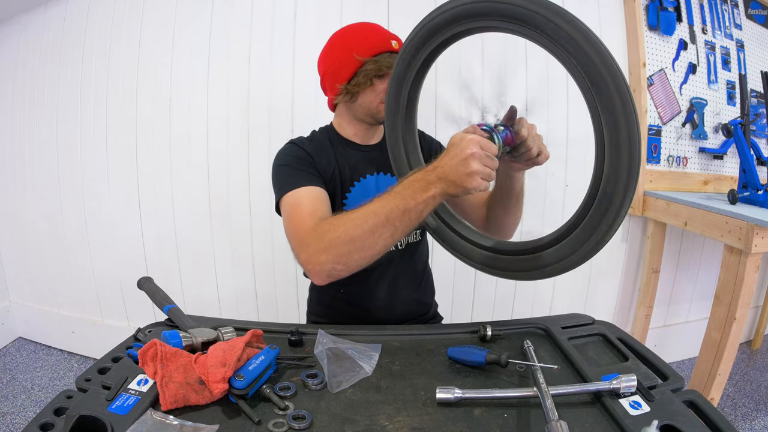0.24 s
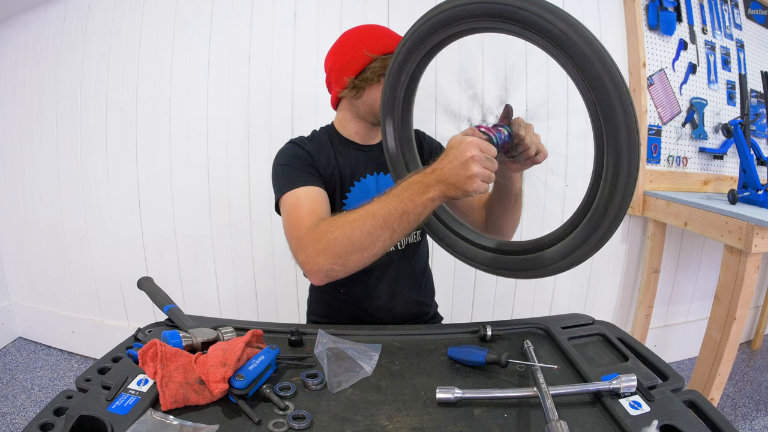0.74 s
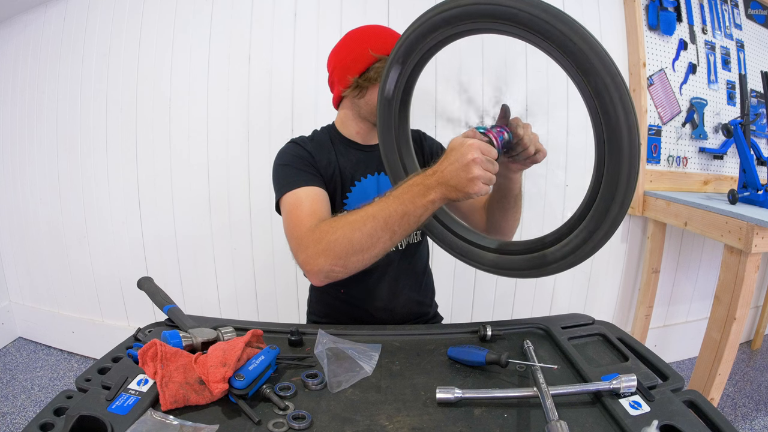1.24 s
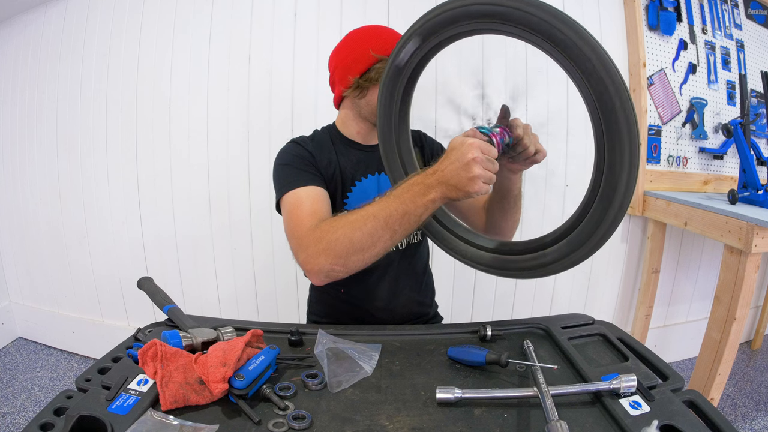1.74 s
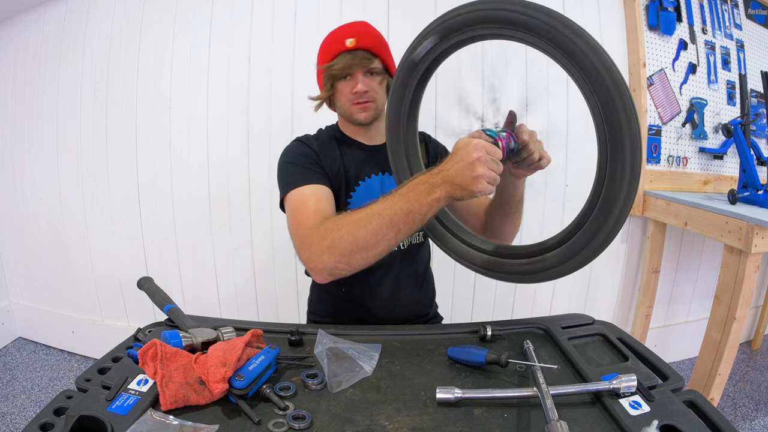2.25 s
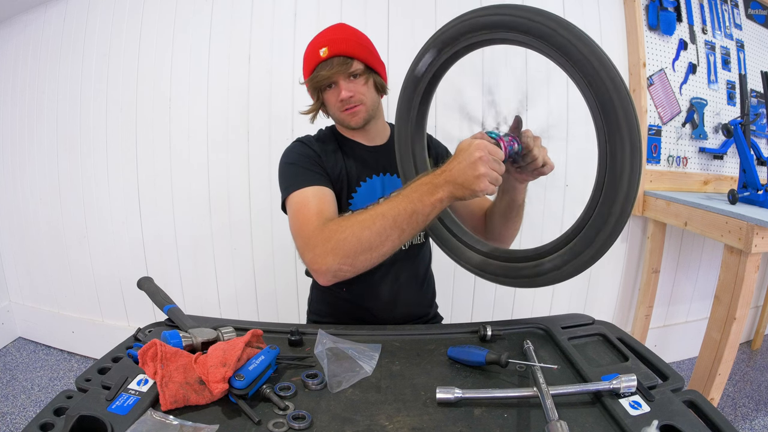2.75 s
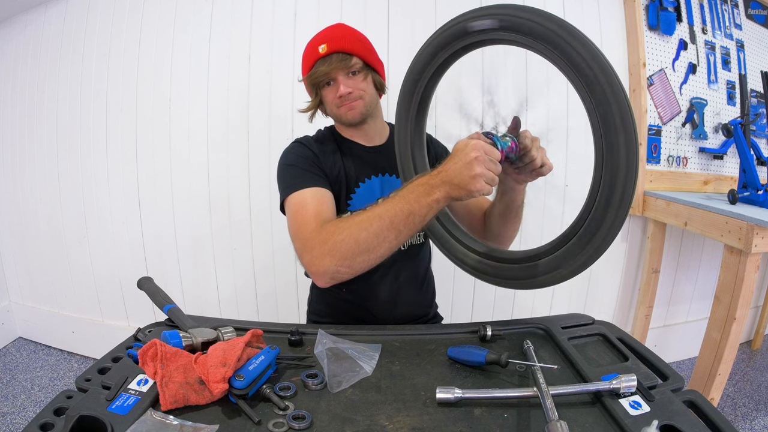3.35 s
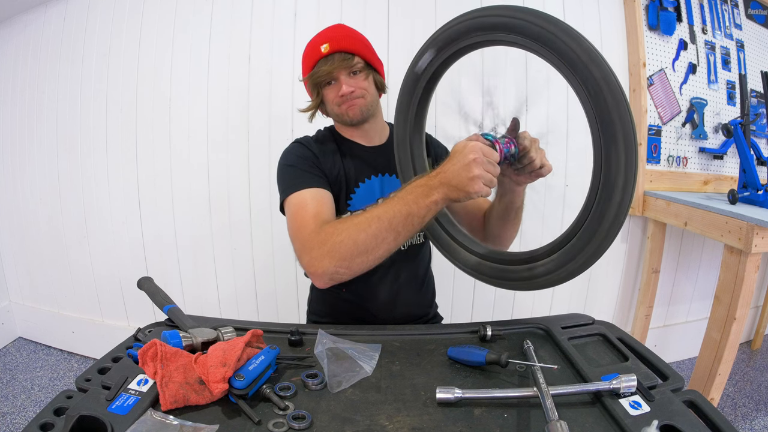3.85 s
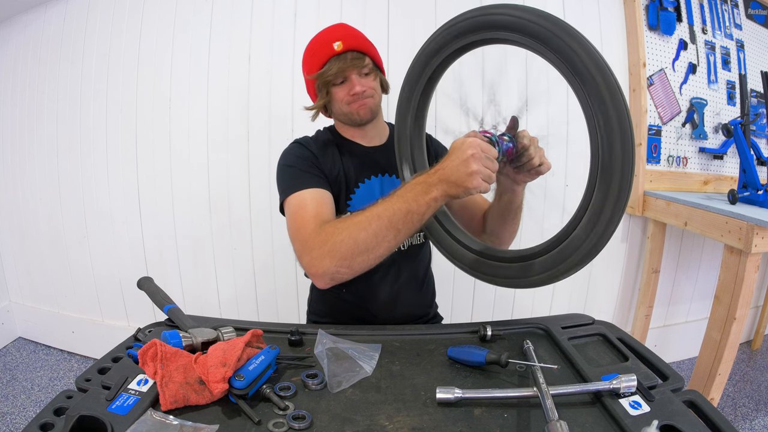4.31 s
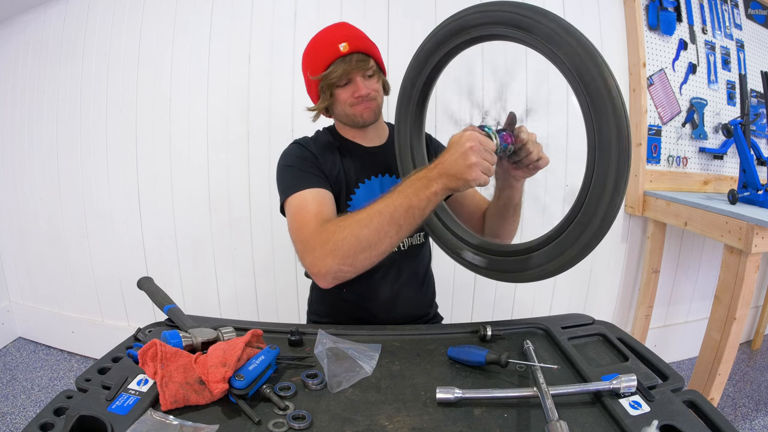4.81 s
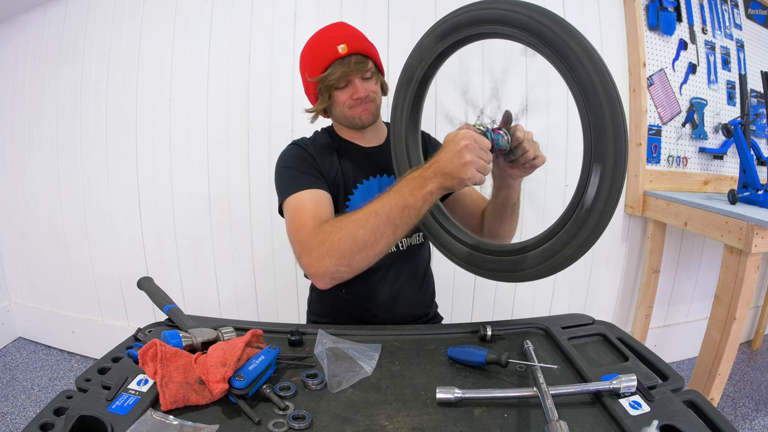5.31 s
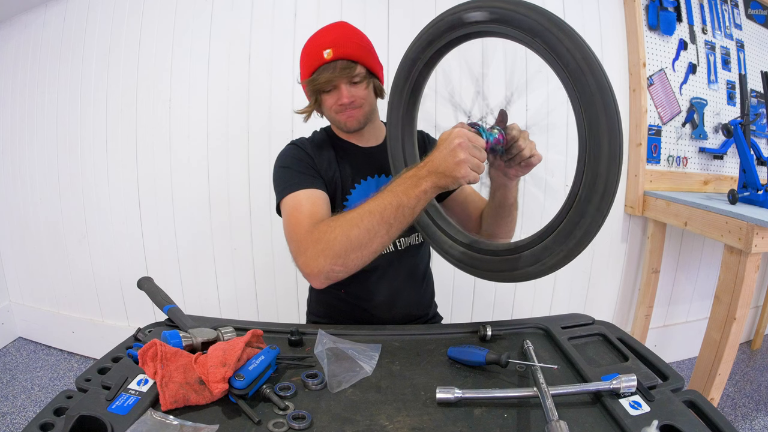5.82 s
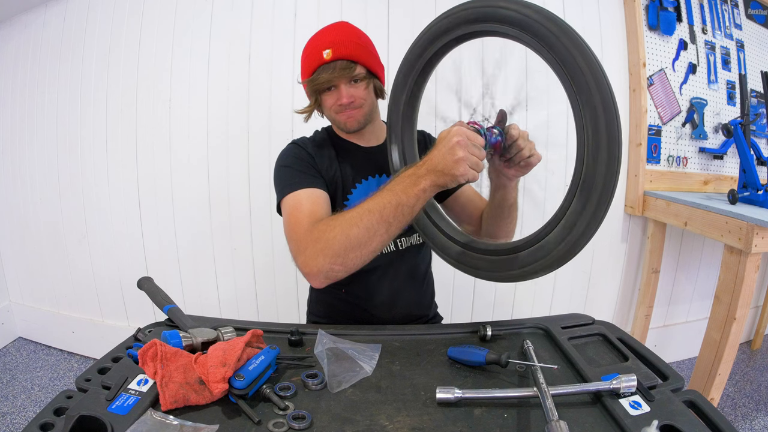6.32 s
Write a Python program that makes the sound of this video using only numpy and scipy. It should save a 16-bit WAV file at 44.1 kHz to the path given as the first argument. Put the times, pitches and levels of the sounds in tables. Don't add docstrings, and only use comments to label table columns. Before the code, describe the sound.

Bright metallic ratchet buzz from a freely spinning bicycle hub, gradually dropping in pitch and softening, over faint room hum and ventilation.

```python
import sys
import numpy as np
from scipy import signal
from scipy.fft import rfft, irfft, next_fast_len
from scipy.io import wavfile
from scipy.ndimage import uniform_filter1d

SR = 44100
rng = np.random.default_rng(int(sys.argv[2]) if len(sys.argv) > 2 else 0)


def output_pcm(signal):
    pcm = np.clip(np.atleast_2d(signal).T, -1, 1) * 32767
    wavfile.write(sys.argv[1], SR, np.round(pcm).astype(np.int16))


def gain_from_db(level_db):
    decades = np.asarray(level_db, float) / 20
    return 10 ** decades


N = 289704
T = np.arange(N) / SR
TEETH = 69

# t/s, tooth-passing rate f/Hz
WHEEL_SPEED = [(0.0, 160), (0.73, 152.4), (1.46, 145), (2.19, 136.5), (2.92, 127.4), (3.65, 122.2),
               (4.38, 113.5), (5.11, 106.6), (5.84, 98.65), (6.57, 90.3)]


def evened(x):
    return x / np.sqrt(np.mean(x ** 2) + 1e-20)


def read(points, hz):
    f, value = np.transpose(points)
    return np.interp(np.log(hz + 1), np.log(f + 1), value)


def causal(power, size=4096):
    log_gain = np.log(power + 1e-10) / 2
    phase = -signal.hilbert(log_gain).imag
    return np.fft.ifft(np.exp(log_gain + 1j * phase)).real[:size]


def bump(s, length):
    return np.exp(-(2 * (T - s) / length) ** 2)


def band_of(x, edges):
    sos = signal.butter(3, edges, "band", fs=SR, output="sos")
    return signal.sosfiltfilt(sos, x)


def room_noise():
    # f/Hz, density level/dB per Hz
    ventilation = [(12, -37), (20, -7), (65, -4), (135, -9), (221, 1), (274, -6), (308, -4.5), (330, -3),
                   (430, 2), (730, -120)]
    # f/Hz, rms level/dB
    hum_lines = [(30.2, -83.5), (60.1, -79.5), (90.2, -81), (120.2, -83.5), (165, -82), (231, -83.5),
                 (360.5, -69.5)]
    hz = np.fft.rfftfreq(N, 1 / SR)
    noise = irfft(rfft(rng.standard_normal(N)) * gain_from_db(read(ventilation, hz)), N)
    hum = sum(np.sqrt(2) * gain_from_db(db) * np.sin(2 * np.pi * (f * T + rng.random())) for f, db in hum_lines)
    return gain_from_db(-68.5) * evened(noise) + hum


def tail():
    # f/Hz, t60/s
    wall_decay = [(300, 1.3), (2000, 0.97), (6000, 3), (15000, 1)]
    # f/Hz, level/dB
    reverberant_share = [(300, -6), (800, -3), (1400, 2), (2500, 8.5), (15000, 10.5)]
    spacing = 12
    taps = np.zeros(SR // 3)
    slots = np.arange(120, len(taps) - 20, spacing)
    signs = rng.choice([-1., 1.], len(slots))
    taps[slots + rng.integers(0, spacing, len(slots))] = signs * np.sqrt(spacing)
    hz, t, z = signal.stft(taps, SR, nperseg=128)
    t60 = np.clip(read(wall_decay, hz), .45, 2)[:, None]
    energy = SR * t60 / (2 * np.log(1000))
    decay = gain_from_db(read(reverberant_share, hz)[:, None] - 60 * t / t60)
    return signal.istft(z * decay / np.sqrt(energy), SR, nperseg=128)[1]


def walls(x, turns, count=15, per_turn=.57):
    size = next_fast_len(len(x) + SR // 2)
    out = rfft(x, size)
    for k in range(count):
        away = (turns * per_turn * count - k + count / 2) % count - count / 2
        share = np.cos(np.pi / 2 * np.clip(away, -1, 1))
        out = out + rfft(share * x, size) * rfft(tail(), size)
    return irfft(out, size)[:len(x)]


def scatter(spread_s=0.00168):
    lag = uniform_filter1d(rng.standard_normal(2049), size=90)
    lag = spread_s * (lag - lag.min()) / np.ptp(lag)
    return irfft(np.exp(-2j * np.pi * np.cumsum(lag) * SR / 4096))


def body():
    # f/Hz, density level/dB per Hz
    snap_colour = [(250, -60), (350, -23.5), (480, -28.5), (570, -17.5), (700, -41), (990, -14.5),
                   (1370, -18), (1800, -28.5), (2800, -17.5), (4600, -14), (5500, -16.5), (8000, -14.5),
                   (10550, -20), (15800, -20)]
    # f/Hz, bandwidth/Hz, level/dB
    wheel_modes = [(436.6, 7.5, -13.5), (633, 77, -10), (824.4, 83, -3), (844.4, 26, -6), (903, 38, -6),
                   (1080, 85, -12.5), (1215, 77, -15), (1483, 24, -7), (1605, 170, -9.5), (1750, 56, -17),
                   (1995, 115, -3.5), (2120, 96, 1), (2300, 332, -1), (2284, 22, -1), (3033, 240, -9),
                   (3386, 210, -8), (3667, 155, -9.5), (4120, 90, -12), (5035, 113, -11.5),
                   (6060, 150, -17.5), (7100, 420, -8.5), (7660, 290, -13), (8320, 490, -13),
                   (9150, 350, -14.5), (10050, 280, -18), (11440, 590, -21), (11940, 440, -19),
                   (13820, 400, -25), (15700, 400, -31)]
    hz = abs(np.fft.fftfreq(2 ** 14, 1 / SR))
    peaks = sum(gain_from_db(2 * db) / (1 + (2 * (hz - f) / width) ** 2) ** 1.37 for f, width, db in wheel_modes)
    steep_bass = 1 / (1 + (360 / (hz + 1)) ** 9)
    return causal((gain_from_db(2 * read(snap_colour, hz)) + peaks) * steep_bass)


def train(at, heights):
    near = np.floor(at * SR).astype(int)[:, None] + np.arange(-7, 9)
    off = near - at[:, None] * SR
    shape = np.sinc(off) * np.cos(np.pi * off / 16) ** 2
    places = np.clip(near + SR, 0, N + SR).ravel()
    return np.bincount(places, (heights[:, None] * shape).ravel(), N + SR + 1)[:-1]


def pawls(jitter_s=.000035, spread_db=1.7, tooth_error=0.0074, bounce_db=-9, bounce_s=0.000591):
    # place in tooth/1, spring level/dB, wobble once a turn/teeth, wobble thrice a turn/teeth
    pawl_set = [
        (.02, 2, 0.0304, 0.0159),
        (.2, -14.5, 0.0582, 0.025),
        (.37, -7.5, 0.036, 0.019),
        (.55, -6.5, 0.0472, 0.019),
        (.68, -8.5, 0.041, 0.018),
        (.87, -11, 0.0552, 0.023),
    ]
    t = np.arange(-SR, N) / SR
    passed = np.cumsum(np.interp(t, *np.transpose(WHEEL_SPEED))) / SR
    tooth = np.arange(1200)
    ring = rng.standard_normal(TEETH)
    out = 0
    for k, (place, db, once, thrice) in enumerate(pawl_set):
        angle = 2 * np.pi * (tooth / TEETH + k / len(pawl_set))
        late, hard, late_again, hard_again = rng.standard_normal(size=(len(tooth), 4)).T
        cut = tooth_error * ring[(tooth + k * TEETH // len(pawl_set)) % TEETH]
        wobble = once * np.sin(angle) + thrice * np.sin(3 * angle + k)
        due = tooth + place + wobble + cut
        at = np.interp(due, passed, t, right=N / SR + 1) + jitter_s * late
        rebound = at + bounce_s * (1 + .15 * late_again)
        out = out + train(at, gain_from_db(db + spread_db * hard))
        out = out + train(rebound, gain_from_db(db + bounce_db + 0.5 * hard_again))
    return out, passed / TEETH


def hub():
    slowed_hz = WHEEL_SPEED[0][1] - np.interp(T, *np.transpose(WHEEL_SPEED))
    clicks, turns = pawls()
    response = np.convolve(body(), scatter())
    ringing = signal.fftconvolve(clicks, response)[:len(clicks)]
    buzz = walls(ringing, turns)
    buzz = (buzz / np.sqrt(uniform_filter1d(buzz ** 2, size=SR // 2)))[SR:]
    low = signal.sosfiltfilt(signal.butter(2, 5000, fs=SR, output="sos"), buzz)
    treble_db = -0.06 + 0.0182 * slowed_hz
    level_db = -23 - 0.0529 * slowed_hz
    return gain_from_db(level_db) * (low + gain_from_db(treble_db) * (buzz - low))


def gripped(buzz):
    # lower f/Hz, upper f/Hz
    ring_halves = [(1800, 2220), (2220, 2700)]
    # t/s, level/dB, length/s
    grip_surges = [(0.48, 3, 0.04), (0.833, 2, 0.086), (1.302, 3, 0.053), (1.602, 2, 0.11),
                   (2.535, 1.5, 0.093), (3.149, 2, 0.048), (3.85, 0.5, 0.13), (4.05, -1.5, .2),
                   (4.405, 2.5, 0.12), (4.65, 2, 0.068), (5.27, 5, 0.033), (6.362, 1.5, 0.12)]
    lean_db = (-1.5 + 1.0 * T) / 2
    surge_db = sum(db * bump(s, length) for s, db, length in grip_surges)
    surge_db = surge_db - surge_db.mean()
    lower, upper = (band_of(buzz, edges) for edges in ring_halves)
    return buzz + (gain_from_db(surge_db - lean_db) - 1) * lower + (gain_from_db(surge_db + lean_db) - 1) * upper


def swelled(buzz):
    # lower f/Hz, upper f/Hz
    rim_ranges = [(720, 960), (520, 720), (960, 1300)]
    rim_modes = [830, 625, 1120]
    # rest level/dB, sink/dB per s, swell once a turn/dB, loudest place in the turn/1
    rim_swell = [(-48.5, -0.44, 3, 0.72), (-52, 1.7, 1.8, 0.4), (-50, .2, 0.9, .2)]
    # t/s, peak level/dB, length/s
    upper_blooms = [(0.043, -45.5, 0.062), (0.34, -46, 0.053), (0.777, -49, 0.11), (1.174, -42, 0.074),
                    (1.73, -43.5, 0.1), (1.924, -46, 0.034), (2.174, -44, 0.081), (2.31, -46.5, 0.038),
                    (2.63, -41.5, 0.057), (3.114, -52, 0.18), (3.708, -41.5, 0.053), (3.855, -50, .08),
                    (4.433, -38, 0.072), (4.593, -47, 0.047), (5.182, -46, .05), (5.24, -45, 0.035),
                    (5.507, -51, .15), (5.693, -48, 0.09), (6.284, -46, 0.042), (6.5, -48, .14)]
    lower_blooms = [(0.352, -50, 0.091), (0.465, -50, 0.035), (0.652, -49, 0.061), (0.79, -51, 0.05),
                    (1.533, -56, 0.053), (2.933, -52, .1), (3.148, -61, 0.056), (3.56, -52.5, 0.18),
                    (4.055, -51, 0.062), (4.95, -48, 0.066), (5.402, -54, 0.068), (6.4, -47, 0.087),
                    (6.49, -48.5, 0.047)]
    top_blooms = [
        (2.632, -48, .08),
        (3.0, -54, .12),
        (3.593, -51, 0.081),
        (3.9, -49, 0.055),
        (4.676, -50, 0.2),
        (5.93, -49, 0.089),
    ]
    pure = 0.71
    settle = 0.54
    speed = np.interp(T, *np.transpose(WHEEL_SPEED))
    teeth = np.cumsum(speed) / SR
    out = buzz
    all_blooms = (upper_blooms, lower_blooms, top_blooms)
    for edges, hz, rule, blooms in zip(rim_ranges, rim_modes, rim_swell, all_blooms):
        rest_db, sink_db, swell_db, place = rule
        facing = np.cos(2 * np.pi * (teeth / TEETH - place))
        wanted = gain_from_db(2 * (rest_db - sink_db * T + swell_db * facing))
        for s, db, length in blooms:
            power = gain_from_db(2 * db) * bump(s, length)
            overtone = np.round(hz / np.interp(s, T, speed))
            tone = np.sqrt(2 * pure * power) * np.exp(2j * np.pi * overtone * teeth)
            wanted = wanted + (1 - pure) * power
            out = out + (tone * np.exp(-1j * np.angle(tone @ buzz))).real
        band = band_of(buzz, edges)
        power = uniform_filter1d(uniform_filter1d(band ** 2, size=1500), size=1500)
        lift_db = np.clip(settle * 10 * np.log10(wanted / (power + 1e-12)), -12, 8)
        out = out + (gain_from_db(lift_db) - 1) * band
    return out


def scene():
    return np.tile(swelled(gripped(hub())) + room_noise(), (2, 1))


def roll_off(x):
    return signal.sosfilt(signal.butter(12, 16860, fs=SR, output="sos"), x)


def record(dry):
    lowpass = signal.firwin(1501, 15740, window=("kaiser", 9), fs=SR)
    dry = signal.oaconvolve(dry, lowpass[None], "same")
    dry = dry * np.minimum(T / .001, 1)
    start = 629
    hz, t, z = signal.stft(dry[0, start:], SR, window="cosine", nperseg=2048)
    band = np.clip(hz // 1400, 0, 15).astype(int)
    filled = (rng.random((16, len(t))) < .018)[band] * (hz[:, None] > 4200)
    scrambled = z * filled * np.exp(2j * np.pi * rng.random(z.shape))
    side = gain_from_db(-2.5) * signal.istft(scrambled, SR, window="cosine", nperseg=2048)[1]
    side = np.pad(side, (start, 0))[:N]
    return roll_off(dry + np.array([side, -side]))


dry = scene()
out = record(dry)
output_pcm(out)
```